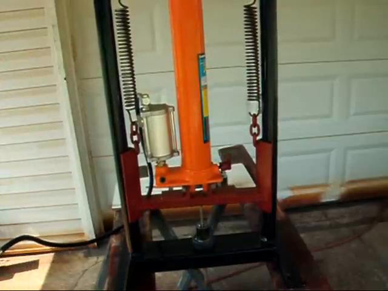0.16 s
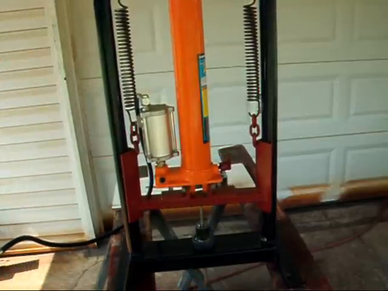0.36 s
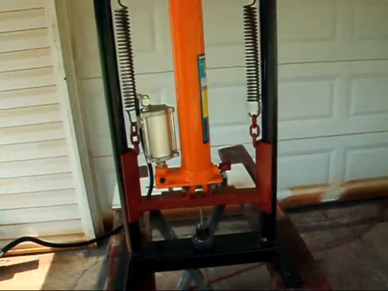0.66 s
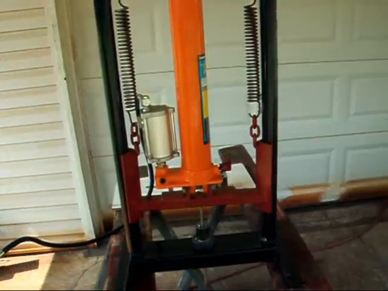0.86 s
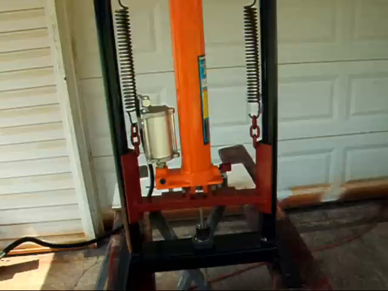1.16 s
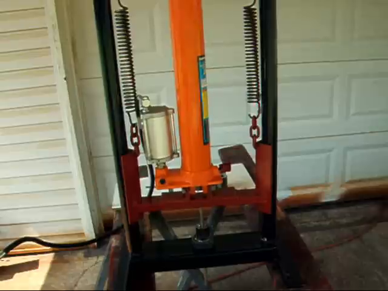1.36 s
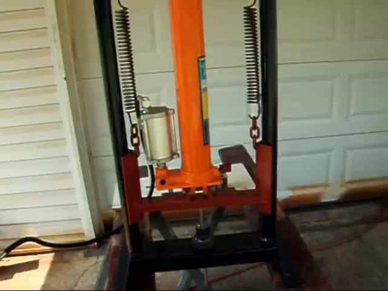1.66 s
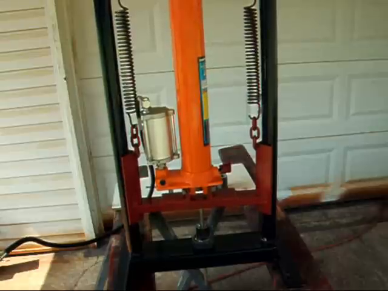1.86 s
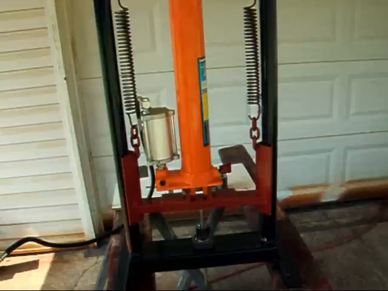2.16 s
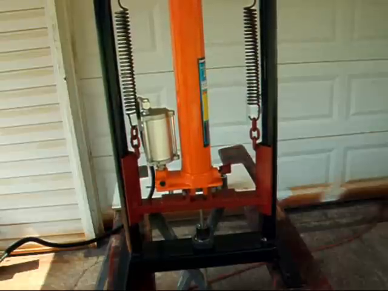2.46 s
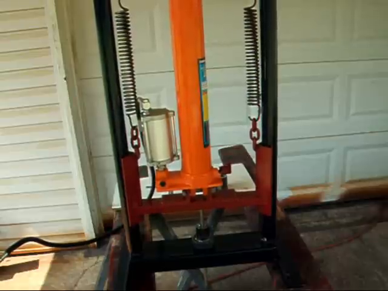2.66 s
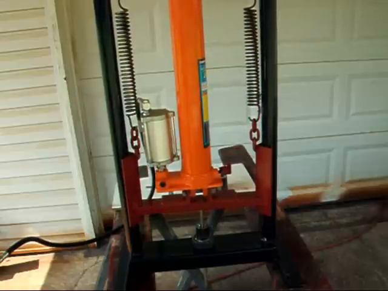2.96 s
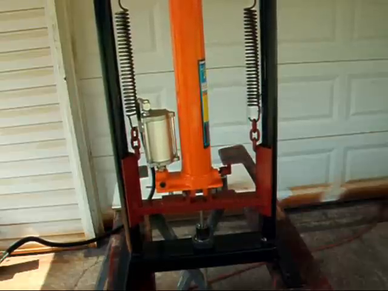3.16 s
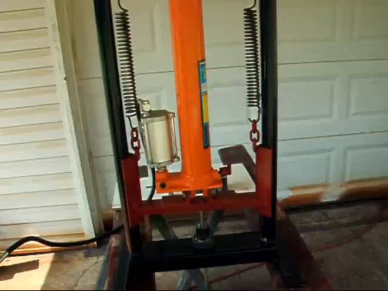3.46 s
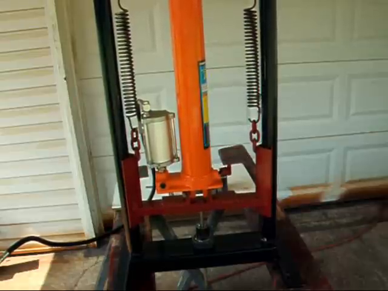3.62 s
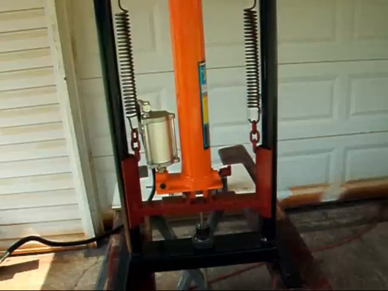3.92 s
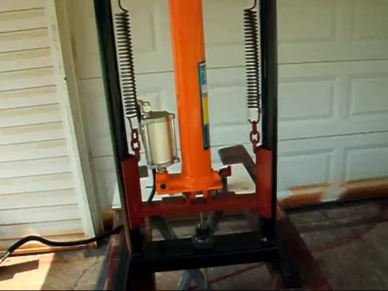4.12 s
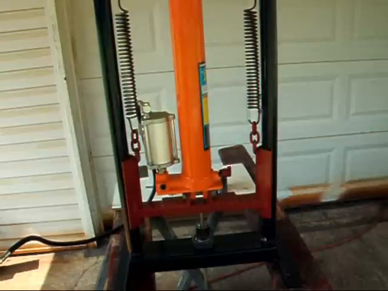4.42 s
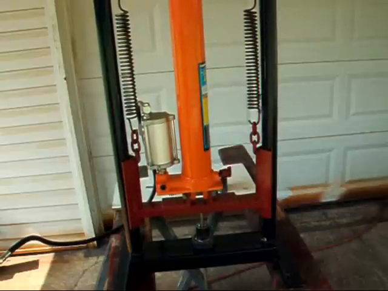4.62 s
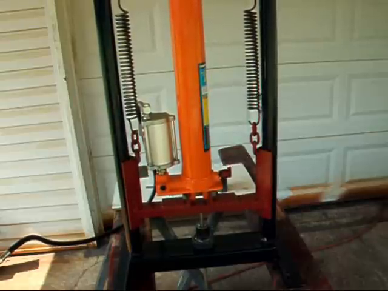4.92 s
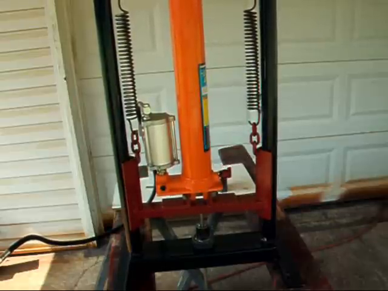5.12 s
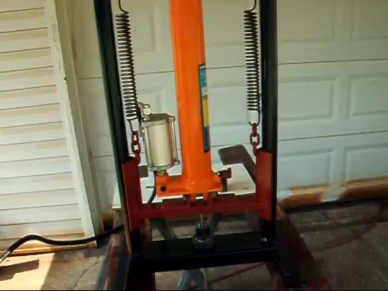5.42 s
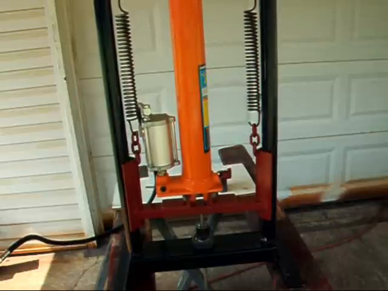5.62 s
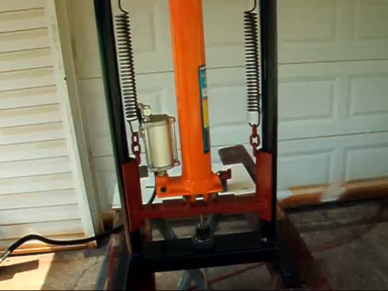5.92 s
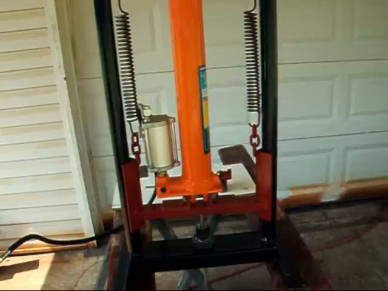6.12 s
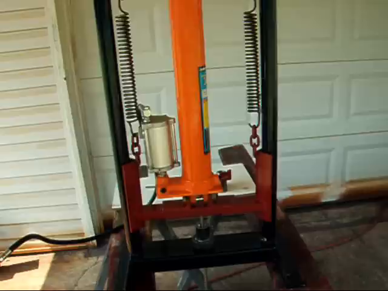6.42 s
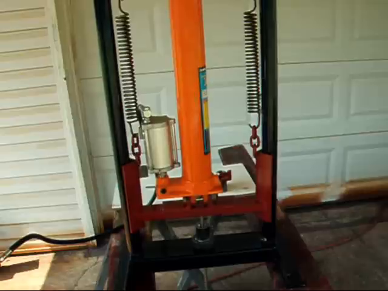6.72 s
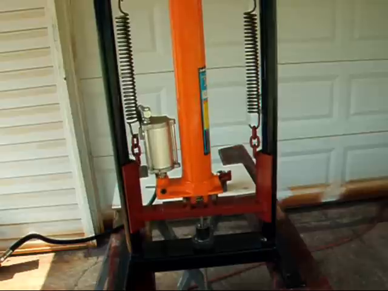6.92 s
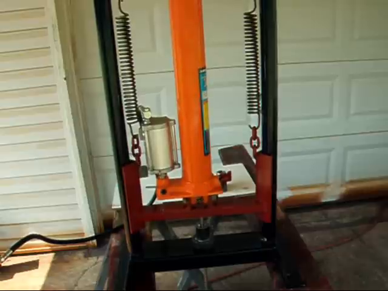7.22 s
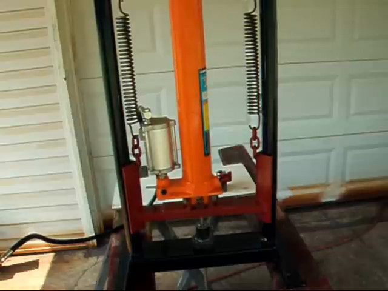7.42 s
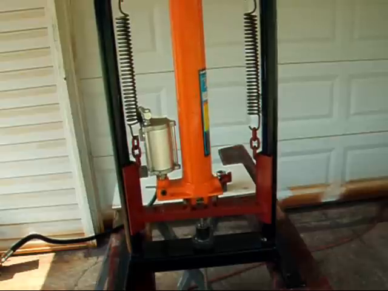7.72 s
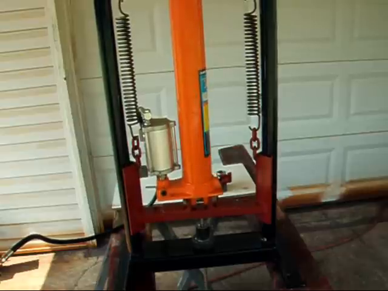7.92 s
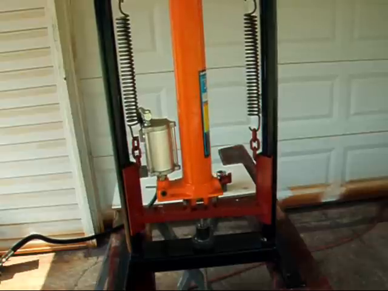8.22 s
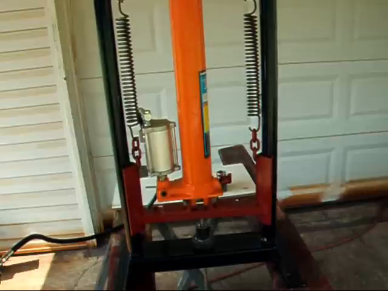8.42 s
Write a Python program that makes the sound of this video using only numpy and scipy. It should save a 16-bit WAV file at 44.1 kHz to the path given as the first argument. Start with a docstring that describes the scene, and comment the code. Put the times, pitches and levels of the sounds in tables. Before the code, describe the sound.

Fast pneumatic rattle of seven to eight strokes a second, sharp air bursts and dull thumps over faint hiss, whistle and low workshop rumble.

```python
"""In a garage, an air-driven pump works the jack of a shop press, seven to eight strokes a second.
Each stroke ticks (valve noise), blasts (noise bursts and cracks), rings the steel (decaying sines)
and lands with a thump (band-limited impulses exciting the modes of the frame).
Between blasts the supply hisses and whistles (broad and narrow-band noise) over a low workshop rumble;
now and then the loaded work knocks in the frame, with a gritty slip."""
import sys
import numpy as np
from scipy import signal
from scipy.fft import rfft, irfft, next_fast_len
from scipy.io import wavfile

SR = 44100
rng = np.random.default_rng(int(sys.argv[2]) if len(sys.argv) > 2 else 0)


def store_pcm(level_fs):
    """Save levels as 16-bit WAV."""
    pcm = np.round(np.clip(level_fs, -1, 1) * 32767).astype(np.int16)
    wavfile.write(sys.argv[1], SR, np.atleast_2d(pcm).T)


N = 378333  # length [samples]

# knocks as the work shifts under load: (t/s, impulse level/dB)
KNOCKS = [(1.546, 15), (1.553, 15), (1.558, 20.5), (1.565, 7), (1.575, 5), (1.879, 13), (1.886, 10),
          (3.735, 10), (3.752, 11), (5.6, 11), (5.698, 16)]
# low modes of the press frame and its bay: (f/Hz, gain at resonance/dB, t60/s)
FRAME_MODES = [(142.3, -4.5, 0.5), (185.8, -4, 0.34), (221, -2, 0.53), (351.5, -8, 0.35), (391, -4, 0.15),
               (542, -9, 0.41), (687, -9, 0.077), (905, 3, 0.24)]
# modes of the air cylinder: (f/Hz, level relative to the stroke's ring/dB, t60/s)
STEEL_MODES = [(1388, -5.5, 0.14), (1493, 1, 0.088), (1595, 1.5, 0.17), (1647, 8, 0.07), (1785, -3.5, 0.17),
               (1986, -7, 0.25), (2316, -10.5, 0.3), (2447, -2.5, 0.16), (3703, 3, 0.095), (3840, -9, 0.11),
               (5790, -3.5, 0.19)]
# narrow bands between blasts: two whistles, and two fainter tones mirrored above 8 kHz: # (f/Hz before the sag,
# width/Hz, level before the sag/dB)
WHISTLE_BANDS = [(5050, 120, -42), (7100, 200, -52.5), (9100, 160, -55), (11030, 170, -49.5)]
# standing waves in the background: (f/Hz before the default stretch, width/Hz, level/dB)
DRONE = [(142.3, 4.9, -49.5), (193.6, 20, -54), (219, 29, -53), (464.4, 82, -54)]
# narrow bands in the air rush: one whistling resonance, and a fainter tone mirrored above 8 kHz: # (f/Hz before
# the default stretch, width/Hz, level relative to the rush/dB)
RUSH_BANDS = [(5830, 490, -8), (10420, 220, -14.5)]
# relative power spectra, normalised in colour(): (f/Hz, level per Hz/dB)
BLAST_SPECTRUM = [(40, -25), (170, -11), (290, 4.5), (500, 5), (1150, -6.5), (1600, 0.5), (2100, -2.5),
                  (3000, -3), (4000, 1.5), (5900, 0.5), (6900, -7), (8700, -9), (10300, -3.5), (15000, -17)]
TICK_SPECTRUM = [(200, -10), (900, 3.5), (1400, -7), (2000, -6.5), (2800, 0), (3800, -1.5), (4700, -2.5),
                 (6300, -9.5), (8000, -10.5), (10000, -11.5), (12000, -10.5), (15000, -22)]
HISS_SPECTRUM = [(1000, -3.5), (2000, -0.5), (3000, -5.5), (5500, 1.5), (8000, -10), (10500, -5),
                 (12500, -7), (15000, -9)]
RUMBLE_SPECTRUM = [(25, -38), (65, -28), (100, -1), (140, -3.5), (300, -3), (450, -0.5), (700, -1.5),
                   (1200, -12.5), (2500, -15.5), (8000, -54)]
VENT_SPECTRUM = [(50, -21), (150, -6), (500, 7.5), (1150, 1.5), (1600, 0.5), (2100, 3), (3000, -2),
                 (4000, -0.5), (5900, -5.5), (7000, -4), (8700, -9.5), (10300, -9), (15000, -12)]
# colour of the slipping metal, likewise
SCRAPE_SPECTRUM = [(100, -18), (450, 3), (1000, -7), (2500, -15), (8000, -39)]
# spectral weight of the garage reverberation: (f/Hz, level/dB)
WET = [(100, 6), (400, -13), (800, -7), (1500, 0), (3000, -8), (6000, -8.5), (10000, -7), (15000, -4)]
# reverberation time of the garage: (f/Hz, t60/s)
ROOM_T60 = [(150, 0.19), (1500, 0.23), (5000, 0.14), (14000, 0.22)]
# direct sound and early reflections from floor, door and walls: (t/s, gain)
ECHOES = [(0, 1), (.00114, .5), (.00438, .26), (.00571, .63), (.0071, .32), (.00862, .43), (.0112, .2),
          (.013, .19), (.0147, .26), (.0163, .23), (.0259, .2)]
# the valve ticks earlier as the load grows: (t/s, lead before the blast/s)
TICK_LEAD = [(0, 0.01845), (8.5, 0.0236)]
# the pump speeds up as it works: (t/s, rate/strokes per s)
PUMP_RATE = [(0, 7.109), (1.2, 7.014), (1.5, 7.186), (2.1, 7.205), (2.6, 7.321), (3.5, 7.48), (3.85, 7.707),
             (5.1, 7.604), (5.5, 7.707), (6.8, 7.738), (7.5, 7.983), (8.5, 7.96)]
# strokes that clang out above the rest: (t/s, extra ring level/dB)
CLANGS = [(1.05, 5), (1.19, 0.5), (4.58, 3), (4.97, 4.5), (5.89, 3), (6.27, 4.5)]
# how hard the piston lands as the load changes: (t/s, impulse level/dB)
PISTON_FORCE = [(0, 20), (0.7, 21), (1.3, 19.5), (3, 20.5), (4.9, 19), (6.1, 21), (6.6, 18), (7.1, 20),
                (8.5, 20)]

FIRST_STROKE_S = 0.0613
# every stroke dumps about the same air; how hard it rings the steel varies more: (mean, scatter)
BLAST_DB, BLAST_SPREAD_DB = -21, 0.17
RING_DB, RING_SPREAD_DB = -30.5, 1.2
# the piston lands a set delay plus a share (0-1) of the stroke after each blast
LANDING_DELAY_S, LANDING_SHARE = 0.024, 0.103
PISTON_SPREAD_DB = 0.23
THUMP_SEND = 0.51  # share of the dull thumps that reaches the far walls (0-1)
CUTOFF_HZ = 15600


def from_db(db):
    """Level definition: decibels to amplitude gain."""
    return 10 ** (np.asarray(db) / 20)


def rms_one(x):
    """Normalisation to unit rms."""
    return x / np.sqrt(np.mean(x ** 2) + 1e-20)


def at_hz(points, hz):
    """Linear interpolation of a table on a logarithmic frequency axis."""
    f, value = np.transpose(points)
    return np.interp(np.log(np.maximum(hz, 1)), np.log(f), value)


def colour(x, spectrum):
    """Minimum-phase filtering: a folded cepstrum gives a causal response of unit power gain."""
    size = 2 * next_fast_len(N // 2 + SR // 4)
    gain = rms_one(from_db(at_hz(spectrum, np.fft.rfftfreq(size, 1 / SR))))
    cepstrum = irfft(np.log(gain))
    cepstrum[1:size // 2] *= 2
    cepstrum[size // 2 + 1:] = 0
    response = np.exp(rfft(cepstrum))
    return irfft(rfft(x, size) * response)[:N]


def clicks(times, gains):
    """Impulse excitation: one weighted sample for each moment."""
    at = np.round(np.asarray(times) * SR).astype(int)
    return np.bincount(np.clip(at, 0, N), gains * np.ones(len(at)), N + 1)[:N]


def puffs(times, levels_db, rise_s, fall_s):
    """Exponential growth to a peak at each moment, then exponential decay."""
    t = np.arange(-SR // 20, SR // 10) / SR
    shape = np.exp(np.minimum(t / rise_s, -t / fall_s))
    envelope = signal.fftconvolve(clicks(times, from_db(levels_db)), shape)
    return envelope[np.argmax(shape):][:N]


def ring(x, hz, t60):
    """Damped oscillator: a unit click starts a decaying sine of initial height 1."""
    radius = from_db(-60 / (t60 * SR))
    angle = 2 * np.pi * hz / SR
    poles = [1, -2 * radius * np.cos(angle), radius * radius]
    return signal.lfilter([0, np.sin(angle)], poles, x + 1e-18)


def narrow_noise(peaks, stretch=0.97):
    """Quadrature modulation: slow noise on two carriers makes narrow bands; stretch scales their pitch."""
    clock = np.cumsum(stretch * np.ones(N)) / SR
    out = 0
    for hz, width, db in peaks:
        lowpass = signal.butter(2, width / 2, fs=SR, output="sos")
        # the first half second of filter settling is dropped
        slow = signal.sosfilt(lowpass, rng.standard_normal((2, N + SR // 2)))[:, -N:]
        phase = 2 * np.pi * hz * clock
        band = slow[0] * np.cos(phase) + slow[1] * np.sin(phase)
        out = out + from_db(db) * rms_one(band)
    return out


def flutter(per_s, depth_db):
    """Random amplitude modulation: a gain interpolated between chance levels."""
    knots = rng.standard_normal(N // 8)
    wander = np.interp(np.arange(N) * per_s / SR, np.arange(len(knots)), knots)
    return rms_one(from_db(depth_db * wander))


def strokes():
    """Periodic motion at a drifting rate: each stroke begins as the one before it ends."""
    edges = [FIRST_STROKE_S]
    while edges[-1] < N / SR:
        rate = np.interp(edges[-1], *np.transpose(PUMP_RATE))
        edges.append(edges[-1] + 1 / rate)
    return np.array(edges[:-1]), np.diff(edges)


def accents(times, rows):
    """Discrete assignment: extra level goes to the stroke nearest each listed moment."""
    nearest = [np.argmin(abs(times - s)) for s, _ in rows]
    return np.bincount(nearest, [db for _, db in rows], len(times))


def background(rumble_db):
    """Broadband noise with slow modulation, plus narrow bands for the standing waves of the workshop."""
    rumble = colour(rng.standard_normal(N), RUMBLE_SPECTRUM) * flutter(per_s=20, depth_db=3.0)
    return from_db(rumble_db) * rumble + narrow_noise(DRONE)


def garage(x):
    """Diffuse reverberation: noise decays at a rate set by its band, with one slap from the far wall."""
    t = np.arange(SR // 3) / SR
    hz = np.fft.rfftfreq(len(t), 1 / SR)
    white = rfft(rng.standard_normal(len(t)))
    slap = 1 + .5 * np.exp(-((t - .036) / 0.0026) ** 2)
    onset = np.clip((t - .002) / 0.011, 0, 1)
    tail = 0
    edges = np.geomspace(40, SR / 2, 14)
    for low, high in zip(edges, edges[1:]):
        centre = np.sqrt(low * high)
        decay = np.exp(-np.log(1000) * t / at_hz(ROOM_T60, centre)) * onset * slap
        band = irfft(white * (hz >= low) * (hz < high), len(t))
        tail = tail + band * decay / np.sqrt(np.sum(decay ** 2)) * from_db(at_hz(WET, centre))
    return x + signal.fftconvolve(x, tail)[:N]


def supply(times, hiss_db, sag_db, glide):
    """Pressure-dependent whistling: it sags in level and pitch around each blast and recovers; hiss is steady."""
    sag = puffs(times + 0.0212, np.zeros(len(times)), rise_s=0.02, fall_s=0.039)
    whistle = narrow_noise(WHISTLE_BANDS, 1 - glide * sag) * from_db(sag_db * sag)
    return whistle + from_db(hiss_db) * colour(rng.standard_normal(N), HISS_SPECTRUM)


def scrape(grit_db, fall_s):
    """Frictional noise: each knock of the loaded work comes with a short gritty slip."""
    times, levels_db = np.transpose(KNOCKS)
    slip = puffs(times, levels_db + grit_db, rise_s=0.001, fall_s=fall_s)
    return colour(slip * rng.standard_normal(N), SCRAPE_SPECTRUM)


def valve(times, tick_db, seep_db):
    """Leakage noise: the valve unseats with a tick, then air seeps out ahead of the blast."""
    chance = rng.standard_normal((len(times), 2))
    at = times - np.interp(times, *np.transpose(TICK_LEAD)) + 0.00043 * chance[:, 0]
    tick = puffs(at, tick_db + 2.1 * chance[:, 1], rise_s=0.00022, fall_s=0.0016)
    seep = puffs(at, seep_db + chance[:, 1], rise_s=0.00073, fall_s=0.03)
    return colour((tick + seep) * rng.standard_normal(N), TICK_SPECTRUM)


def thump(times, levels_db, low_hz, high_hz):
    """Cushioned impact: too soft for treble, on a body too small to radiate deep bass."""
    highpass = signal.butter(2, low_hz, "high", fs=SR, output="sos")
    lowpass = signal.butter(6, high_hz, fs=SR, output="sos")
    blows = 1e-18 - clicks(times, from_db(levels_db))
    return signal.sosfilt(lowpass, signal.sosfilt(highpass, blows))


def frame(x):
    """Early reflection and modal resonance: thumps bounce off near surfaces and set low modes humming."""
    near = signal.fftconvolve(x, clicks(*np.transpose(ECHOES))[:SR // 20])[:N]
    out = near
    for hz, db, t60 in FRAME_MODES:
        quality = hz * t60 * np.pi / np.log(1000)
        out = out + from_db(db) * signal.lfilter(*signal.iirpeak(hz, quality, fs=SR), near)
    return out


def cylinder(times, ring_db, spread_db):
    """Modal excitation: every stroke strikes each steel mode with a strength of its own."""
    out = 0
    for hz, db, t60 in STEEL_MODES:
        chance = rng.standard_normal((len(times), 2))
        strikes = clicks(times + 0.000796 * chance[:, 0], from_db(ring_db + db + spread_db * chance[:, 1]))
        out = out + ring(strikes, hz, t60)
    return out


def vent(times, levels_db, fall_s):
    """Jet noise, broad with narrow bands: the rest of the air rushes out as the piston travels back."""
    rush = colour(rng.standard_normal(N), VENT_SPECTRUM) + narrow_noise(RUSH_BANDS)
    return rush * puffs(times + 0.0054, levels_db, rise_s=0.0051, fall_s=fall_s)


def exhaust(times, blast_db, air_db, crack_db, tint_db):
    """Turbulent discharge: the valve flies open on a ragged burst of air with a few hard cracks inside."""
    burst = puffs(times, blast_db + air_db, rise_s=0.0031, fall_s=0.0034)
    air = burst * rng.standard_normal(N) * flutter(per_s=2500, depth_db=1.0)
    chance = rng.standard_normal((len(times), 2, 3))
    for k in range(chance.shape[2]):
        crack_gains = from_db(blast_db + crack_db) * chance[:, 1, k]
        air = air + clicks(times + .0011 * chance[:, 0, k], crack_gains)
    # no two bursts have quite the same colour
    hz, _, frames = signal.stft(air, SR, nperseg=256)
    midpoints = (times[1:] + times[:-1]) / 2
    stroke = np.searchsorted(midpoints, np.linspace(0, N / SR, frames.shape[1]))
    knots = np.linspace(0, SR / 2, 28)
    chance_tints = rng.standard_normal((len(times), len(knots)))
    tints = np.array([np.interp(hz, knots, row) for row in chance_tints])
    tinted = signal.istft(frames * from_db(tint_db * tints[stroke].T), SR)[1][:N]
    return colour(tinted, BLAST_SPECTRUM)


def scene():
    """Superposition: common strokes drive valve, exhaust, steel and piston over the steady sources."""
    times, lengths = strokes()
    chance = rng.standard_normal((len(times), 4))
    blast_db = BLAST_DB + BLAST_SPREAD_DB * chance[:, 0]
    ring_db = RING_DB + RING_SPREAD_DB * chance[:, 1] + accents(times, CLANGS)

    ticks = valve(times, tick_db=-30.0, seep_db=-33.0)
    # the pump body recoils as the valve opens
    recoil_times = times - .003 + 0.00043 * chance[:, 2]
    recoil = thump(recoil_times, blast_db + 41.0, low_hz=209, high_hz=236.0)
    landings = times + LANDING_DELAY_S + LANDING_SHARE * lengths
    piston_db = np.interp(times, *np.transpose(PISTON_FORCE)) + PISTON_SPREAD_DB * chance[:, 3]
    piston = thump(landings, piston_db, low_hz=248, high_hz=653)
    knocks = thump(*np.transpose(KNOCKS), low_hz=287, high_hz=610)
    thumps = frame(recoil + piston + knocks)
    steel = cylinder(times, ring_db, spread_db=2.0)
    rush = vent(times, blast_db - 2.5, fall_s=0.033)
    blast = exhaust(times, blast_db, air_db=7.5, crack_db=15.0, tint_db=0.55)

    reverberant = garage(blast + ticks + THUMP_SEND * thumps)
    press = reverberant + (1 - THUMP_SEND) * thumps + rush + steel
    air_feed = supply(times, hiss_db=-45.0, sag_db=-22.0, glide=.045)
    slips = scrape(grit_db=-46.5, fall_s=0.012)
    return (press + air_feed + background(rumble_db=-39.0) + slips)[None]


def record(dry):
    """Soft saturation and band limiting: peaks are rounded and the top is cut."""
    lowpass = signal.ellip(10, .1, 80, CUTOFF_HZ, fs=SR, output="sos")
    return signal.sosfilt(lowpass, 1.3 * np.tanh(dry / 1.3))


dry = scene()
out = record(dry)
store_pcm(out)
```